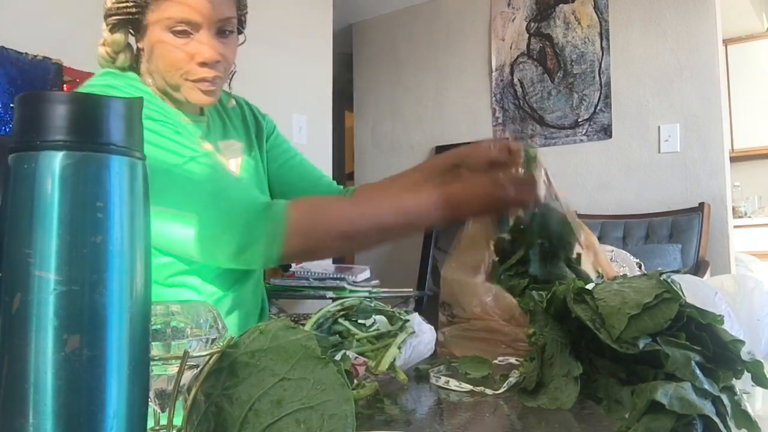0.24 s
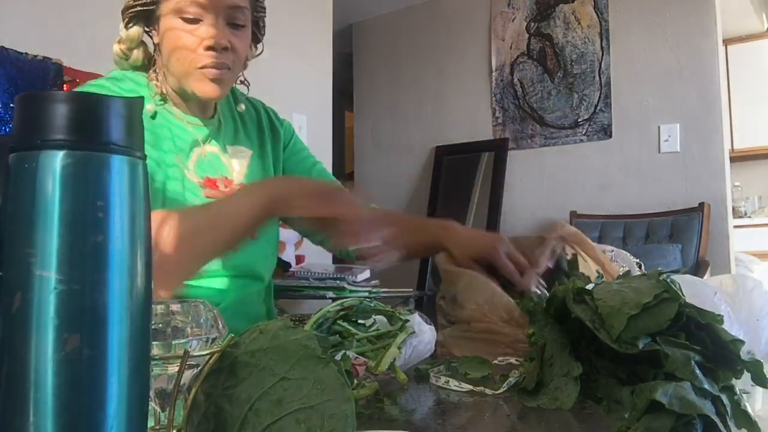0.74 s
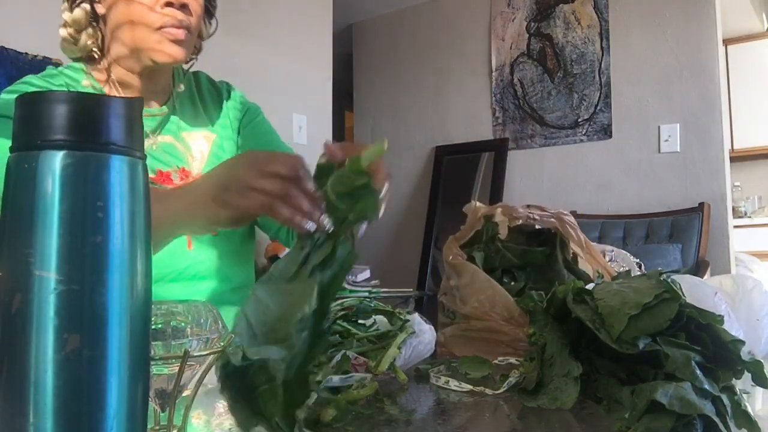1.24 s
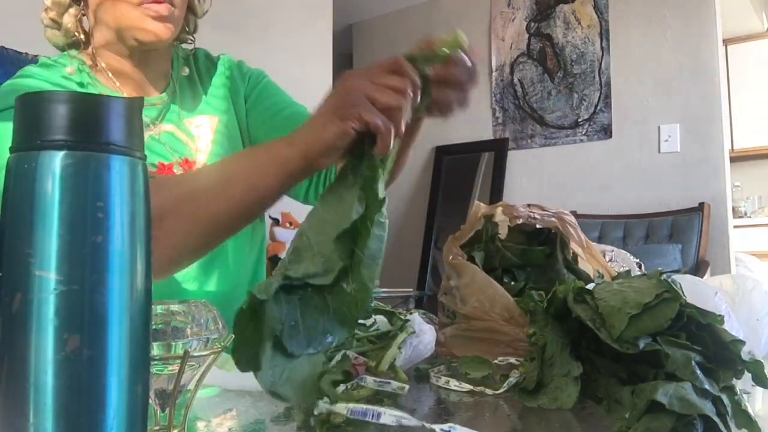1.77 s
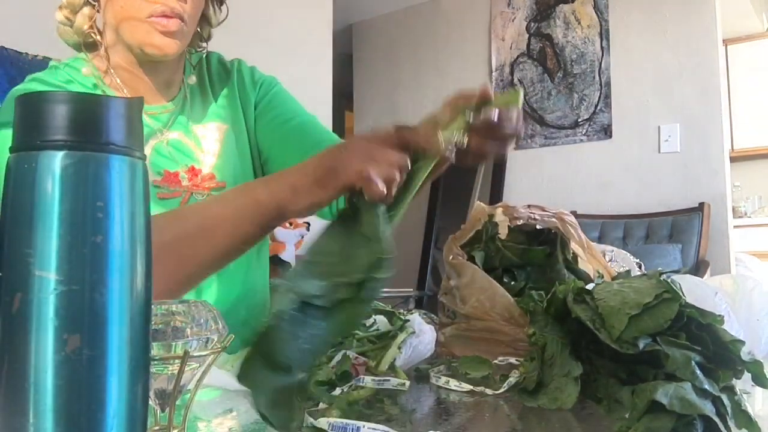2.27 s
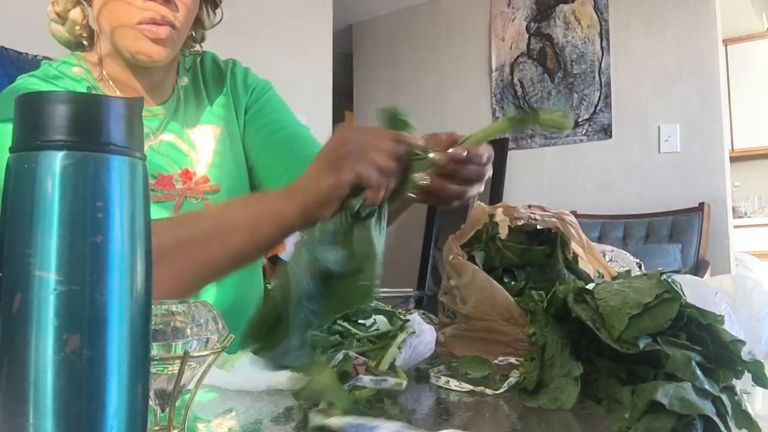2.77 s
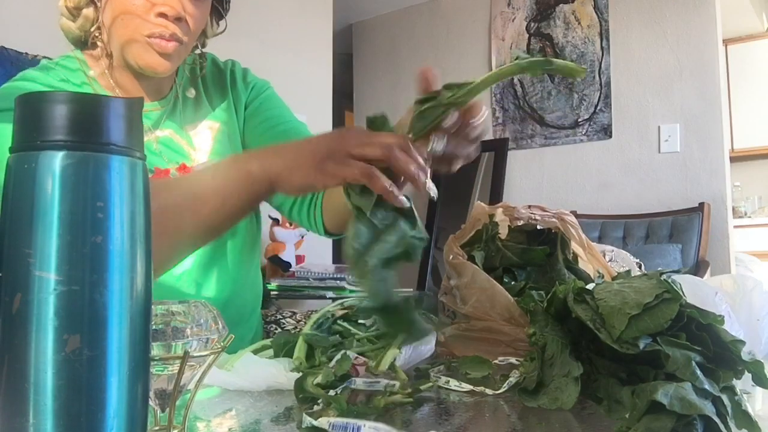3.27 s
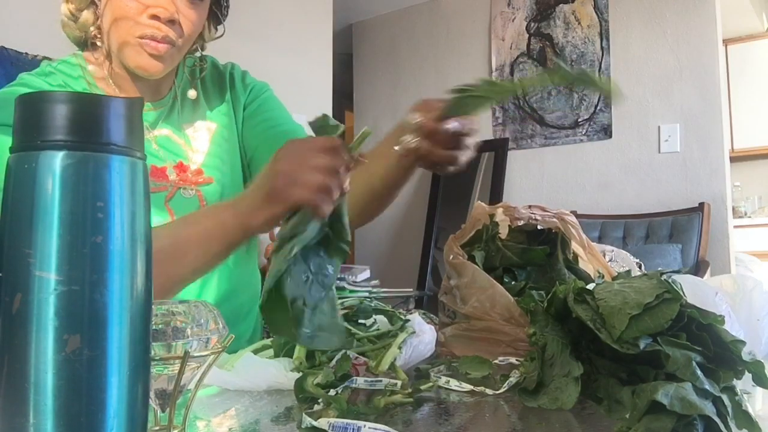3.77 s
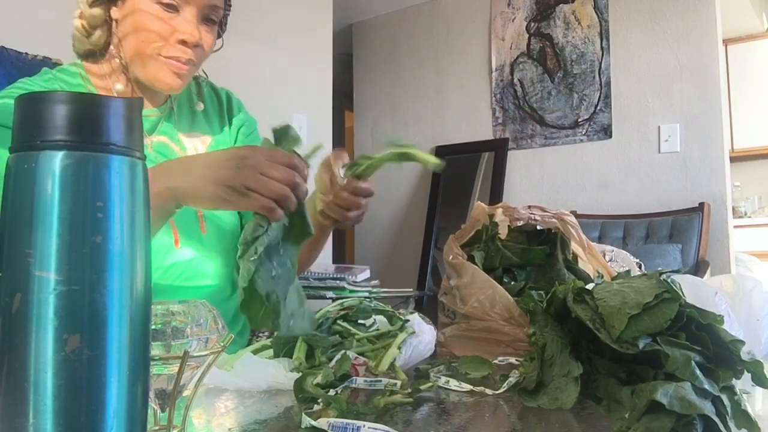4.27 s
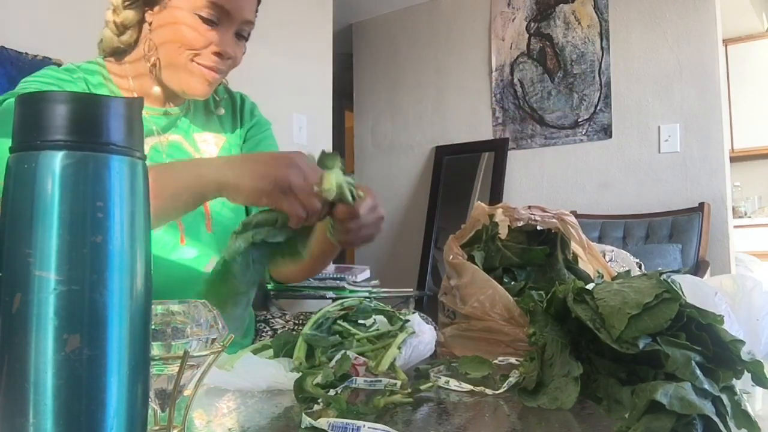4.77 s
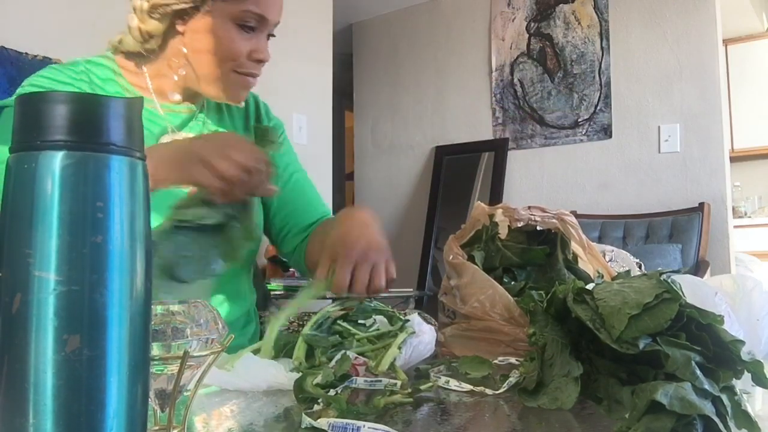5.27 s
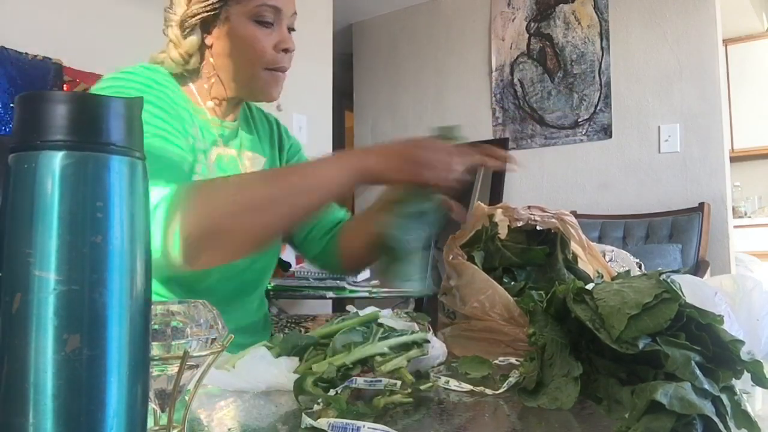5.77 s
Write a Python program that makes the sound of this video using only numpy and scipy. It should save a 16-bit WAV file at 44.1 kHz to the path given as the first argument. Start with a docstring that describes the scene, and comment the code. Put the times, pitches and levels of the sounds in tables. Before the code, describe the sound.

A close, mono indoor sound with a short faint room echo, soft air noise and a very quiet low appliance drone. From 0 to 1.2 s hands push into a thin bag: smooth, papery rustles swell, strongest near 0.4 s and again around 0.65 s. A near lull follows, then small crisp clicks from 1.4 to 1.8 s as a leaf is gripped. At about 2.0-2.2 s a loud cluster of moist, crunchy rib snaps breaks out; lighter ticks follow, then a second dense tearing burst at 2.75-3.0 s. A tiny rubbery squeak comes near 3.3 s, and a short sharp crackle at 3.6 s. Sparse, delicate crackles and small creaks fill 4.1-4.8 s, with a bright double snap at 4.95 s. It quiets, then a soft swishing rustle spreads from 5.4 to 5.6 s, and small leafy crackles and rustling close at 5.8-6 s.

```python
"""Fresh leafy greens rustle at a table indoors: hands push them into a thin bag, then strip a leaf.
The rustle is smooth noise and tiny crease pulses, coloured by broad resonances, in bursts and faint beds.
Leaf ribs snap as noise bursts through resonances; creaks, short puffs and dull bumps are noise through
a narrow or broad resonance, and a short squeak is a run of unsteady tones near 1 kHz. The room adds
a faint echo to these, and behind all lie air noise and an appliance drone."""
import sys
import numpy as np
from scipy import signal
from scipy.fft import rfft, irfft, next_fast_len
from scipy.io import wavfile
from scipy.ndimage import uniform_filter1d, map_coordinates

SR = 44100
rng = np.random.default_rng(int(sys.argv[2]) if len(sys.argv) > 2 else 0)


def voltage_ratio(level):
    """Linear amplitude factor for a level in decibels (scalar or array-like)."""
    return 10 ** (np.asarray(level, float) / 20)


def wav_record(signal):
    """Record a signal, one row per channel, as 16-bit PCM in the file named by sys.argv[1]."""
    frames = np.transpose(np.atleast_2d(signal))
    bounded = np.clip(frames, -1, 1)
    # unit amplitude maps onto the largest positive 16-bit level
    quanta = np.round(bounded * 32767).astype(np.int16)
    wavfile.write(sys.argv[1], SR, quanta)


N = 265482


def unit(x):
    """Normalisation to an rms of one."""
    return x / np.sqrt(np.mean(x ** 2) + 1e-20)


def along(points, hz):
    """Spectral envelope: (Hz, value) points joined on a logarithmic frequency axis."""
    f, value = np.transpose(points)
    return np.interp(np.log(hz + 1), np.log(f + 1), value)


def wobble(rate_hz):
    """Slow random modulation: a smooth curve through rate_hz random knots a second."""
    knots = rng.standard_normal(int(N * rate_hz / SR) + 4)
    return map_coordinates(knots, [np.arange(N) * rate_hz / SR])


def filtered(x, response):
    """Linear filtering: the spectrum of x times a response given as a function of Hz."""
    size = next_fast_len(len(x) + 4096)
    spectrum = rfft(x, size) * response(np.fft.rfftfreq(size, 1 / SR))
    return irfft(spectrum, size)[:len(x)]


def resonance(f, hz, width_hz):
    """Damped oscillator: a second-order band-pass response with unit gain at hz."""
    return 1j * f * width_hz / (hz * hz - f * f + 1j * f * width_hz)


# spectral shape of the air noise: frequency_hz, relative_level_db (per Hz)
AIR_SPECTRUM = [(25, -8), (42, -21), (58, 3), (100, 2), (190, -6.5), (250, -3.5), (350, -8), (500, -19),
                (1000, -15), (1700, -30), (2800, -28), (4200, -28), (5000, -29), (15700, -54)]


def air():
    """Broadband noise: shaped random pressure whose level drifts slowly about -62 dB."""
    noise = unit(filtered(rng.standard_normal(N), lambda f: voltage_ratio(along(AIR_SPECTRUM, f))))
    return voltage_ratio(-62 + 1.4 * wobble(2.7)) * noise


# partials of the appliance drone: pitch_hz, level_db (rms, before its slow wander)
DRONE_PARTIALS = [(59, -67.5), (119, -73.5), (148, -72), (236, -75)]


def drone():
    """Additive synthesis: steady partials of an appliance, wandering in level and phase."""
    t, out = np.arange(N) / SR, 0
    for pitch_hz, level_db in DRONE_PARTIALS:
        gain = np.sqrt(2) * voltage_ratio(level_db + 2.2 * wobble(2.95))
        out = out + gain * np.sin(2 * np.pi * pitch_hz * t + 0.6 * wobble(3.2))
    return out


# decay of the room: frequency_hz, t60_s
ROOM_DECAY = [(300, 1), (2000, 0.47), (10000, 0.34)]


def room(x):
    """Reverberation: convolution with noise that dies at its own speed at each frequency."""
    hz, t, z = signal.stft(rng.standard_normal(SR // 2), SR, nperseg=256)
    decay = voltage_ratio(-60 * t / along(ROOM_DECAY, hz)[:, None])
    tail = signal.istft(z * decay, SR, nperseg=256)[1]
    delayed = np.pad(x, (130, 0))  # samples, about 3 ms
    return signal.fftconvolve(delayed, tail / np.linalg.norm(tail))[:N]


# wet leaf slipping under a finger: start_s, length_s, pitch_hz, level_db (rms at mid-swell, before wander)
SQUEAKS = [(3.258, .045, 1105, -47), (3.305, .033, 1095, -48), (3.33, .085, 935, -57)]


def squeak():
    """Stick-slip: rough tones near 1 kHz, unsteady in pitch and level, each swelling and fading."""
    t, out = np.arange(N) / SR, 0
    for start_s, length_s, pitch_hz, level_db in SQUEAKS:
        swell = np.sin(np.pi * np.clip((t - start_s) / length_s, 0, 1)) ** 1.7
        phase = 2 * np.pi * np.cumsum(pitch_hz * (1 + 0.015 * wobble(100))) / SR
        gain = np.sqrt(2) * voltage_ratio(level_db + 1.5 * wobble(60))
        out = out + swell * gain * np.sin(phase)
    return out


# creaks, short puffs and dull bumps: start_s, length_s, centre_hz,
# width_hz (of each of two resonances in series), level_db (rms at mid-swell)
CREAKS_PUFFS_BUMPS = [(0.779, .15, 580, 110, -61), (1.092, 0.039, 1265, 90, -53.5),
                      (1.587, 0.082, 2400, 900, -53), (1.797, 0.07, 2750, 500, -57),
                      (1.902, 0.021, 3660, 300, -47), (2.388, 0.014, 2600, 250, -48),
                      (2.422, .012, 3200, 1200, -44), (2.479, .014, 3800, 1400, -41),
                      (2.592, .008, 3300, 1800, -35), (2.67, 0.051, 1257, 349, -48.5),
                      (2.99, 0.029, 450, 500, -46), (3.262, .07, 880, 120, -55),
                      (4.108, .012, 6600, 600, -54), (4.12, 0.027, 3140, 300, -53),
                      (4.246, .015, 4400, 1300, -39), (4.268, .018, 1800, 600, -48),
                      (4.274, .012, 4600, 1500, -47), (4.508, .014, 2000, 1500, -49),
                      (4.555, 0.055, 1180, 80, -56), (4.75, 0.02, 1550, 500, -50),
                      (4.8, .02, 4900, 1600, -46), (5.401, 0.032, 296, 251, -53.5),
                      (5.427, 0.15, 2780, 1200, -50.5)]


def creaks_puffs_bumps():
    """Band-pass filtering: noise through a narrow or broad resonance, swelling and fading."""
    t, out = np.arange(N) / SR, np.zeros(N)
    for start_s, length_s, centre_hz, width_hz, level_db in CREAKS_PUFFS_BUMPS:
        span = (t > start_s) & (t < start_s + length_s)
        band = filtered(rng.standard_normal(SR // 4), lambda f: resonance(f, centre_hz, width_hz) ** 2)
        swell = np.sqrt(np.sin(np.pi * (t[span] - start_s) / length_s))
        out[span] += voltage_ratio(level_db) * swell * unit(band)[-span.sum():]
    return out


def ticks(count):
    """Random process: small creases give way as snaps whose level follows the rustle and crispness."""
    when, size, pitch, bright, fall = rng.random((count, 5)).T
    start_s = 0.02 + when * (N / SR - 0.04)
    gain = rustle_strength(start_s, upper=0.86) * grip(start_s)[0] ** 2
    peak_db = 20 * np.log10(gain) + 9 - 3 * np.log(1 - 0.95 * size)
    crack_db = -12 + 16 * (bright - 0.5)
    fall_ms = 0.85 * (0.27 + 2 * fall)
    return np.transpose([start_s, peak_db, 1400 * 3.3 ** pitch, crack_db, fall_ms])


# leaf ribs giving way: peak_s, peak_db (of the ring), centre_hz, crack_over_ring_db,
# fall_ms (for 10 dB of the exciting burst, at least 0.3)
SNAPS = [(.1068, -37.5, 4340, 2, 2), (1.371, -31, 3600, 9, 1.5), (1.4624, -32.5, 2600, -8, 3),
         (1.4931, -26.5, 2480, -12, 2), (1.4971, -33, 1500, -4, 2), (1.52, -31.5, 3550, -4, 0.5),
         (1.5377, -34, 3320, -19, 3), (1.5874, -25.5, 2870, -11, 9), (1.6932, -36, 2500, -20, 1),
         (1.8053, -39, 2720, -8, 5), (1.8838, -43, 3790, -11, 2.5), (1.9776, -27, 1610, 1, 2),
         (1.9856, -19, 4120, -8.5, 2), (2.0183, -29, 3150, -8, 3), (2.025, -12, 3400, -7, -0.04),
         (2.0374, -24, 3980, -16, 3), (2.0437, -27, 3920, -14, 0.5), (2.065, -23, 2940, -7, 6),
         (2.0762, -18, 4230, -12, 8), (2.0847, -9, 3500, -10, 4), (2.1304, -18, 3830, -20, 3),
         (2.1552, -24, 2330, -19, 2), (2.1775, -24, 3460, -7, 4), (2.3128, -34, 2260, 4, 0),
         (2.3685, -42, 1550, -15, 0.5), (2.3959, -41, 2560, -16, 2), (2.4307, -32, 3160, -18, 6),
         (2.5557, -30.5, 3130, -7, 4), (2.5673, -22, 3450, -14, 8), (2.5953, -29, 3060, -20, .6),
         (2.767, -21.5, 3550, -14.5, 3.5), (2.798, -20.5, 3530, -19, -0.2),
         (2.8136, -19.5, 3380, -4.5, 1.5), (2.8302, -28.5, 3830, 5, .6), (2.8474, -31, 2990, -13, 1.5),
         (2.8574, -25, 3010, -26, 0), (2.8611, -10, 3840, -13, 2.5), (2.8964, -19, 3460, 0, -1),
         (2.901, -19.5, 4740, -2, 2), (2.9148, -23, 2020, -18, 2.5), (2.921, -25, 1830, -13, 5),
         (2.9324, -18.5, 1550, -15, 3), (2.944, -19, 4000, -15, 4), (2.9507, -19, 1750, -14, 0),
         (2.9738, -23, 1090, -23, -0.5), (2.9938, -19.5, 1160, -14, 0), (3.331, -31, 5340, -4, 0),
         (3.301, -32.5, 3660, -9, 2), (3.4368, -36, 1840, -8, 1), (3.447, -37, 2180, -8, 0.5),
         (3.456, -38, 1790, -5, 3), (3.4681, -35, 1830, -13, 2), (3.4866, -36.5, 1940, -13.5, 3),
         (3.5474, -35, 3340, -13, 0.5), (3.5935, -23, 4100, -16, 5.5), (3.6, -21, 1820, -7, 0.5),
         (3.6134, -21, 3000, 6, .5), (3.6222, -22, 3400, 1, 1), (3.6317, -21, 4030, 1, -1.5),
         (3.7542, -41, 5500, -10, 0), (3.8054, -41, 4600, -27, 3.5), (4.035, -45, 2760, -10.5, 5),
         (4.1097, -37, 2980, -11, 7), (4.1153, -29.5, 3620, -14.5, 3.5), (4.1768, -37, 5020, -1, 2.5),
         (4.1892, -33, 1780, -10, 6), (4.2802, -31, 1850, -12, 7), (4.3796, -37.5, 4650, -12, 1.6),
         (4.418, -36.5, 1630, -11, 9), (4.4666, -39.5, 4160, -11, 4), (4.5171, -36, 1880, -11, 9),
         (4.5934, -41.5, 3940, -10, 2), (4.757, -36.7, 1520, -22, 11.5), (4.9344, -25, 1620, -7, 0.3),
         (4.9401, -19, 1720, 4, 1.5), (4.9486, -18, 4150, -11, .5), (4.9577, -28, 1550, -1, 1.5),
         (4.9783, -29, 4010, -13, -1), (5.006, -33, 4160, -15, 5), (5.074, -47.5, 4050, 4, 3),
         (5.1654, -43, 2960, -9, 2), (5.218, -52.5, 4470, -8, -5), (5.3146, -58.5, 4200, -6, -8),
         (5.3339, -58, 4000, 2, 5), (5.7898, -40, 1690, -8.5, 1), (5.8103, -36, 1570, -14.5, 3),
         (5.8247, -39.5, 1420, -7, 1), (5.8781, -38, 1390, -8.5, 1.8), (5.8835, -39.5, 1590, -3.5, -2),
         (5.895, -35, 5550, -10, 5), (5.9275, -33, 3360, -1, 0), (5.937, -30, 3400, -4, 5)]


def snaps():
    """Impulsive excitation: a sharp break amid a noise burst rings the leaf, under a shorter bright crack."""
    rows = np.vstack([SNAPS, ticks(count=340)])
    peak_s, peak_db, centre_hz, crack_db, fall_ms = rows.T[:, :, None]
    rise_ms = 0.45 * fall_ms
    step = np.arange(-700, 1348)  # samples about the break
    ms, f = step / SR * 1000, np.fft.rfftfreq(len(step), 1 / SR)
    away = np.where(ms < 0, -ms / np.maximum(rise_ms, 0.1), ms / np.maximum(fall_ms, 0.3))
    shape_db = -10 * away
    noise = rng.standard_normal((len(peak_s), 2, len(step)))
    burst = noise + [[7], [3]] * (step == 0)  # the break itself, in ring and crack
    leaf = resonance(f, centre_hz, 0.44 * centre_hz) ** 2 + 0.46 * resonance(f, 3180, 4600) ** 2
    rolloff = 1 / (1 + 1j * f / 6000) ** 2  # the ring falls away steeply above about 6 kHz
    ring = irfft(rfft(burst[:, 0] * voltage_ratio(shape_db)) * leaf * rolloff)
    crack = irfft(rfft(burst[:, 1] * voltage_ratio(2.24 * shape_db)) * resonance(f, 11700, 11700) ** 2)
    ring /= np.abs(ring).max(axis=1, keepdims=True)
    crack /= np.abs(crack).max(axis=1, keepdims=True)
    snap = voltage_ratio(peak_db) * (ring + voltage_ratio(crack_db) * crack)
    at = np.round(peak_s * SR).astype(int) + step
    return np.bincount(at.ravel(), snap.ravel(), minlength=N)[:N]


# bursts of rustle from the hands, and the faint rustle between them: peak_s, lower_ring_db,
# upper_over_lower_db (before the weight upper), sizzle_over_lower_db,
# swell_s and fade_s (for 10 dB at steep 1, at least 0.002)
RUSTLES = [(0, -57, 0.5, 0, .05, .06), (0.111, -61, 1, 1, -0.1, 0.1), (.143, -58, 5.5, 11.5, -0.05, 0.11),
           (0.183, -52, -1, 3.5, -0.02, 0.14), (.34, -51, -1, 5, .09, 0.09),
           (0.434, -40.5, -3, 0, 0.06, 0.1032), (0.611, -46.5, -0.5, 3.5, 0.08, .05),
           (.67, -47.5, 0, 5, 0.08, 0.0642), (.82, -53, -1, 3, 0.18, 0.17), (1.0, -53.5, 0, 7, 0.15, 0.06),
           (1.12, -52, -3.5, -6.5, .08, .06), (1.25, -66, 1, -3, .08, .15), (1.385, -69, 7, 3, .015, 0.1),
           (1.459, -56.5, 3.5, -15, 0, 0.15), (1.535, -55, -2.5, -8, 0.09, 0.06),
           (1.588, -53, 8, 1.5, .008, -0.02), (1.62, -61, 1, -3, -0.18, .2), (1.817, -60, 3, -6, .04, 0.15),
           (1.912, -55.5, 2, -11, 0.04, 0.13), (1.985, -54, 3, -16, .015, .08),
           (2.04, -46.5, 1, -2, 0.05, .06), (2.079, -34.5, 1, -9, 0.0121, 0.0622),
           (2.17, -50.5, 3.5, -5, 0.0551, .05), (2.294, -58.5, 8.5, 3.5, 0.03, 0.08),
           (2.38, -62, 3, -8, -0.26, 0.25), (2.437, -59, 12, -7, 0.03, .06),
           (2.488, -53.5, 10, 7, -0.02, 0.01), (2.52, -64.5, 5.5, -10, .03, 0),
           (2.567, -50.5, 6, -5.5, 0.03, 0.04), (2.67, -51.5, 2, -16.5, 0.15, 0.07),
           (2.72, -45, 4.5, 1.5, 0.0042, 0.0175), (2.79, -52.5, 6, -7, 0.09, 0.03),
           (2.875, -42.5, -4, -3, 0.023, 0.06), (2.93, -41, 1.5, -10, 0.11, .075),
           (3.02, -50, 0, -14, .02, .02), (3.088, -49, 4, -8.5, .04, 0.0854),
           (3.277, -49.5, 0, -6, 0.09, 0.0944), (3.47, -53, -0.5, -6.5, 0.06, 0.11),
           (3.551, -50, 4, -3, 0, 0.06), (3.607, -42.5, 3.5, 3.5, 0.0147, 0.0622),
           (3.77, -63, 0, -5, 0.5, 0), (3.89, -60, -2, -13, 0.13, .04), (4.03, -72.5, -9, -15, 6, 0.5),
           (4.118, -61, 5, -5, 0.04, 0.12), (4.19, -55.5, 1, -9, .07, 0.12), (4.252, -56, 8, -2, .004, .02),
           (4.29, -55, 5, -4, .025, .07), (4.417, -54, 0, -8.5, .004, .015), (4.45, -60, 3, -8, .03, .05),
           (4.518, -59, 4, -8, 0.05, 0.08), (4.596, -54.5, -3, -15, 0, 0.05), (4.7, -63, 0, -7, .07, .08),
           (4.755, -62, 0, -10, .006, .03), (4.81, -70, 10, 10, 0.06, .02), (4.915, -57, -1, -3, .04, .04),
           (4.949, -44, 2, -2, .012, .047), (5.1, -64, 0, -9, .1, 0.13), (5.25, -72, -12, -8, 1, .08),
           (5.372, -52, 2, -5.5, .002, .06), (5.41, -50, 2, -5, .02, .08), (5.47, -49.5, 2.5, -4, .03, .12),
           (5.55, -50, 2, -4, 0.0866, 0.13), (5.76, -64, 2.5, -3, -0.02, .06),
           (5.84, -54, -8, -15.5, 0.04, -0.1), (5.887, -50, 2, -9, .03, -0.03),
           (5.946, -50, 0.5, 1, 0.0357, 1)]


def rustle_strength(time, steep=1, upper=0, sizzle=0):
    """Energy summation: the strength of one layer from all rows, each swelling to its peak and fading."""
    peak_s, lower_db, upper_db, sizzle_db, swell_s, fade_s = np.transpose(RUSTLES)[:, :, None]
    t = np.arange(0, N / SR + 0.002, 0.001)
    before = (peak_s - t) / np.maximum(swell_s, 0.002)
    after = (t - peak_s) / np.maximum(fade_s, 0.002)
    away = np.where(t < peak_s, before, after)
    peak_db = lower_db + upper * upper_db + sizzle * sizzle_db
    level_db = peak_db - 10 * steep * away ** 1.28  # 1 = pointed peak, 2 = rounded top, steep skirts
    return np.interp(time, t, np.linalg.norm(voltage_ratio(level_db), axis=0))


# what the hands hold: time_s, crispness (0 = smooth bag to 1 = crisp leaf), body_over_lower_ring_db
HELD = [(0, 0.12, -5), (1.1, .11, -5.5), (1.3, 0.63, -5.5), (2.1, 0.61, -9), (2.4, 0.46, -6),
        (2.65, .6, -10.5), (2.85, .6, -10), (3.0, .55, -7), (3.2, 0.44, -11), (3.65, 0.33, -12),
        (4.2, 0.62, -11), (4.8, 0.57, -8.5), (5.3, 0.63, -14), (5.4, 0.2, -13), (5.7, .2, -11),
        (5.85, 0.35, -11), (6.02, .23, -8)]


def grip(time):
    """Interpolation: crispness and body level (dB) of what is held at the given times."""
    time_s, crispness, body_db = np.transpose(HELD)
    return np.interp(time, time_s, crispness), np.interp(time, time_s, body_db)


def creases(count, spread_db, most_db, cycles):
    """Superposed impulses: tiny folds as damped sines at any pitch, a few much bigger than the rest."""
    when, pitch, size, phase = rng.random((count, 4)).T
    hz = (500 * 32 ** pitch)[:, None]
    t = np.arange(96) / SR
    size_db = np.minimum(-spread_db * np.log(1 - size), most_db)
    gain = voltage_ratio(size_db)[:, None] * hz / 2000  # even energy per Hz
    grains = gain * np.exp(-t * hz / cycles) * np.sin(2 * np.pi * (hz * t + phase[:, None]))
    at = (when * N).astype(int)[:, None] + np.arange(len(t))
    return unit(np.bincount(at.ravel(), grains.ravel(), minlength=N)[:N])


# where crumpled sheets ring, a lower and an upper band: frequency_hz, relative_level_db (per Hz)
RING_SPECTRA = [
    [(600, -37), (1000, -3), (1600, 1.5), (2200, -3), (3000, -16), (5000, -41.5)],
    [(1500, -55), (2400, -7.5), (3000, -1), (4300, 0.9), (4900, -5.5), (6500, -13.5), (9000, -37)],
]
# the treble sizzle: frequency_hz, relative_level_db (per Hz)
SIZZLE_SPECTRUM = [(4300, -64), (5200, -7), (6500, -1), (8000, 0), (12000, 0.5), (15700, -3)]
# the low body: frequency_hz, relative_level_db (per Hz)
BODY_SPECTRUM = [(90, -16), (170, -3), (250, 2), (600, 1.5), (1000, -3.5), (1500, -47)]


def rustle():
    """Source and filter: smooth swish and crisp creases excite two broad rings, a sizzle and a body."""
    time = np.arange(N) / SR
    crisp, body_db = grip(time)
    fits = voltage_ratio(crisp * (2.1 * wobble(60) + 2.44 * wobble(250)))  # crisp leaf gives way in fits
    swish = rng.standard_normal(N)
    crackle = creases(count=16000, spread_db=3.5, most_db=14.5, cycles=1.7)
    mix = np.sqrt(1 - crisp) * swish + np.sqrt(crisp) * crackle
    _, frames, z = signal.stft(mix * unit(fits), SR, nperseg=512)
    # patches of time and frequency vary in level, more so in crisp leaf
    patches = uniform_filter1d(rng.standard_normal(z.shape), size=6, axis=0)
    patches = unit(uniform_filter1d(patches, size=5, axis=1))
    patch_db = (1.2 + 2.8 * grip(frames)[0]) * patches
    sheet = signal.istft(z * voltage_ratio(patch_db), SR, nperseg=512)[1][:N]
    spectra = (*RING_SPECTRA, SIZZLE_SPECTRUM, BODY_SPECTRUM)
    low, high, sizzle, body = [unit(filtered(sheet, lambda f: voltage_ratio(along(c, f)))) for c in spectra]
    rings = rustle_strength(time) * low + rustle_strength(time, upper=0.96) * high
    bright = rustle_strength(time, steep=1.13, sizzle=1) * sizzle  # swells and fades faster than the rings
    return rings + bright + rustle_strength(time) * voltage_ratio(body_db) * body


def scene():
    """Superposition: near sounds with their room echo, the rustle and the background."""
    near = snaps() + squeak() + creaks_puffs_bumps()
    echo = voltage_ratio(-11.5) * room(near)
    return (near + rustle() + echo + air() + drone())[None]


# microphone dips: centre_hz, width_hz (at half the depth in dB), gain_db
MIC_DIPS = [(4870, 150, -1.5), (10620, 810, -4.5)]


def dips_and_band_limit(x):
    """Frequency response: the microphone's narrow dips, then a band limit on the whole sound."""
    def response(f):
        dips_db = sum(db * np.abs(resonance(f, hz, width)) ** 2 for hz, width, db in MIC_DIPS)
        limit = np.where(f < 15800, 1, voltage_ratio(-30) * (f < 16800))  # 30 dB down, then silent
        return voltage_ratio(dips_db) * limit
    return filtered(x, response)


def top_cut(x):
    """Nothing passes above the cut-off."""
    return signal.sosfilt(signal.butter(12, 16990, fs=SR, output="sos"), x)


def record(dry):
    """Stages in series: the scene through the microphone's dips and the band limit, then the last stage."""
    mix = dips_and_band_limit(dry[0])[None]
    return top_cut(mix)


dry = scene()
out = record(dry)
wav_record(out)
```